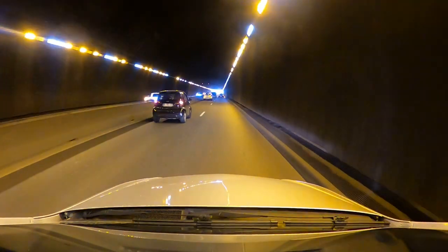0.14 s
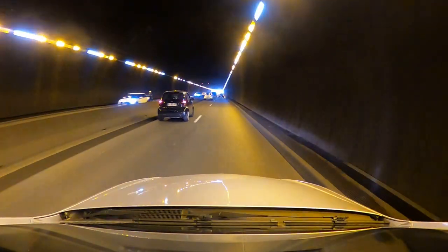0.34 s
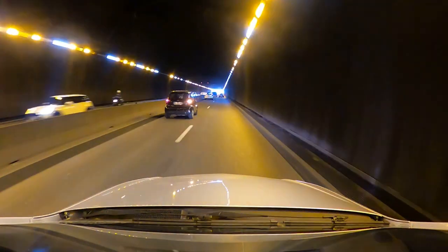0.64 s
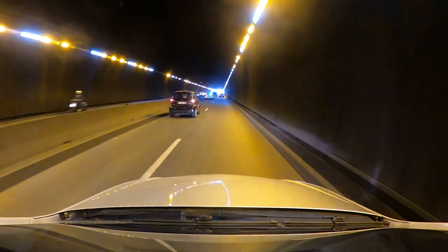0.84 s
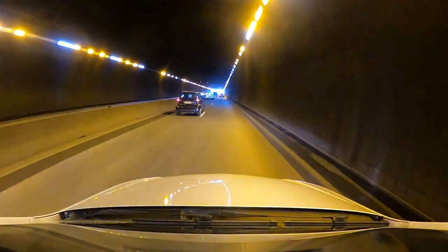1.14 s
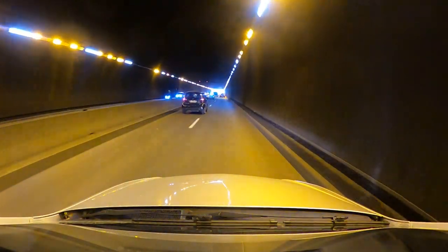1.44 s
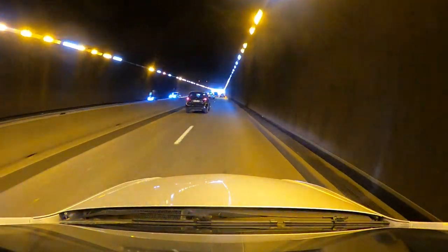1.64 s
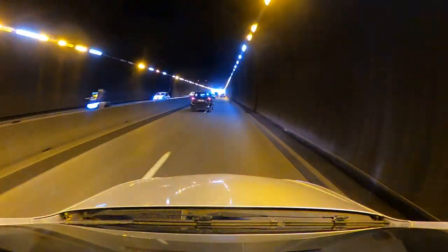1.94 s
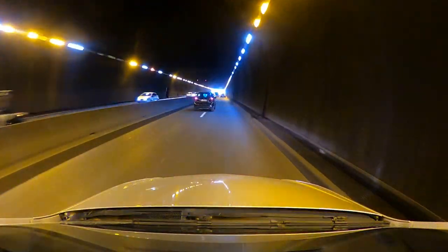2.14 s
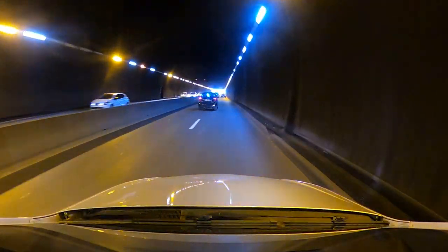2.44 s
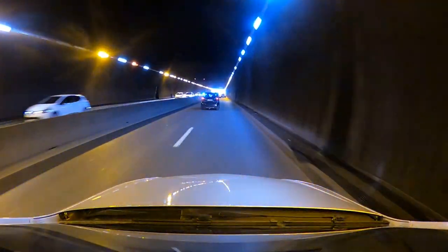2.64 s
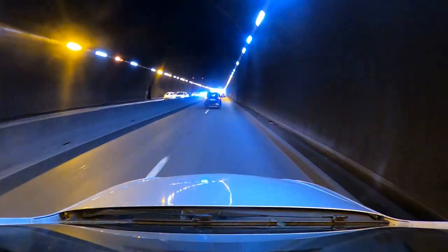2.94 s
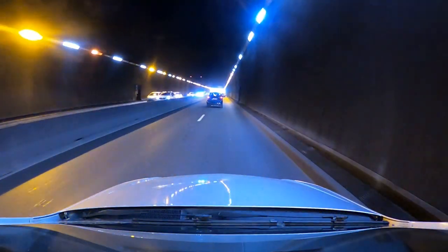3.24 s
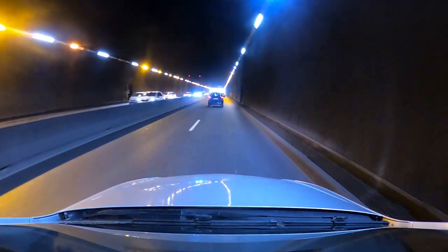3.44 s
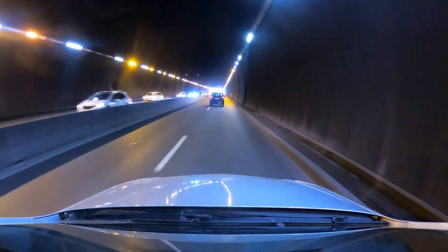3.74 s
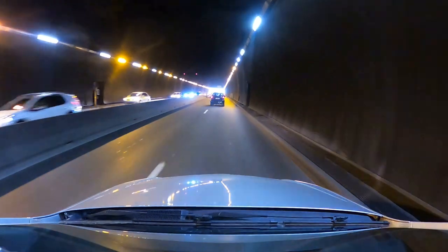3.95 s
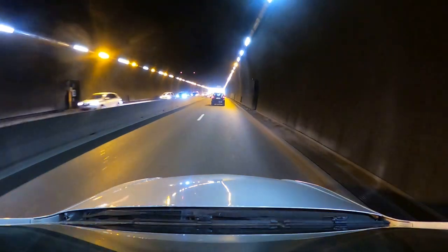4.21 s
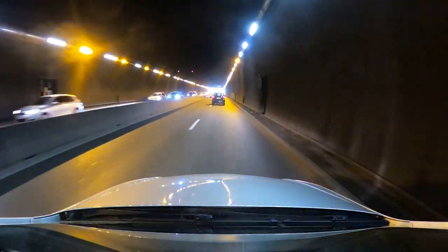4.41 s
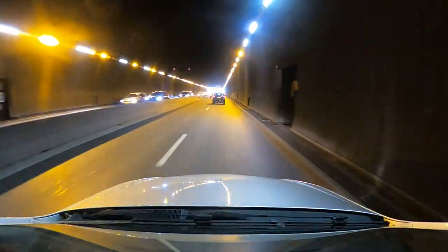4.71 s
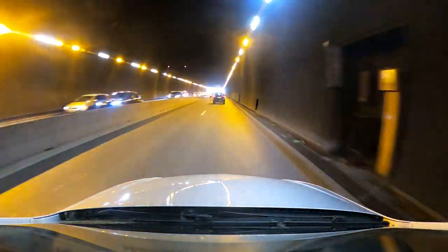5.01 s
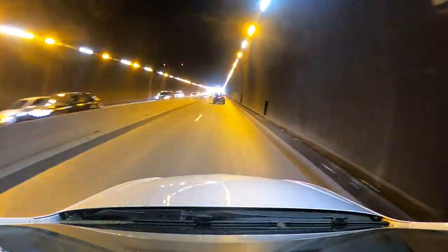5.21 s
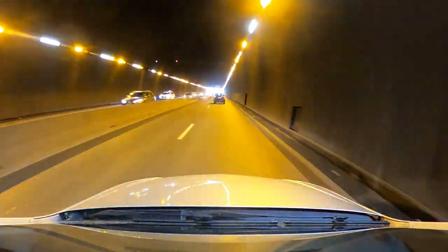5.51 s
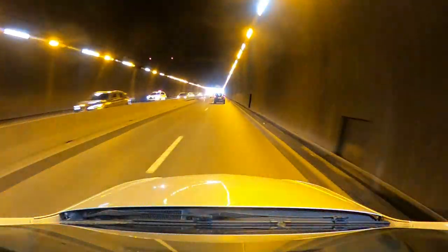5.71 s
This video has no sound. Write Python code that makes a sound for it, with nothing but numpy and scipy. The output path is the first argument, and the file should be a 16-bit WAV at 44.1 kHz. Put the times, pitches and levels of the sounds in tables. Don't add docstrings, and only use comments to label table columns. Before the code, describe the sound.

Steady boomy tunnel drive heard from a car's bonnet: shuddering low air rumble, broad tyre roar, faint hiss, soft passing swells.

```python
import sys
import numpy as np
from scipy import signal
from scipy.fft import rfft, irfft, next_fast_len
from scipy.io import wavfile
from scipy.ndimage import uniform_filter1d

SR = 44100
rng = np.random.default_rng(int(sys.argv[2]) if len(sys.argv) > 2 else 0)


def magnitude_from_level(level_db):
    exponent = np.asarray(level_db, float) / 20
    return 10 ** exponent


def output_pcm(signal):
    pcm = np.clip(np.atleast_2d(signal).T, -1, 1) * 32767
    wavfile.write(sys.argv[1], SR, np.round(pcm).astype(np.int16))


N = 258867
FRAME = 1024


def unit(x):
    return x / np.sqrt(np.mean(x ** 2) + 1e-20)


def curves(rows):
    s, *cols = np.transpose(rows)
    return [np.interp(np.arange(N) / SR, s, c) for c in cols]


def filtered(x, response):
    margin = 4096
    m = next_fast_len(len(x) + 2 * margin)
    wide = np.pad(x, (margin, m - len(x) - margin), "reflect")
    spectrum = rfft(wide) * response(np.fft.rfftfreq(m, 1 / SR))
    return irfft(spectrum, m)[margin:][:len(x)]


def coloured(x, spectrum):
    f, db = np.transpose(spectrum)

    def response(hz):
        return magnitude_from_level(np.interp(np.log(hz + 1), np.log(f + 1), db, left=-120, right=-120))

    return filtered(x, response)


def rush(spectrum, patchy_db):
    z = signal.stft(rng.standard_normal(N + 1024), nperseg=512)[2]
    field = uniform_filter1d(rng.standard_normal(z.shape), size=5, axis=0)
    field = uniform_filter1d(field, size=12, axis=1)
    noise = signal.istft(z * magnitude_from_level(patchy_db * unit(field)), nperseg=512)[1][:N]
    return unit(coloured(noise, spectrum))


def evened(x, window_s, share):
    size = max(int(window_s * SR), 1)
    power = uniform_filter1d(uniform_filter1d(x ** 2, size), size)
    return unit(x / (np.abs(power) + 1e-6) ** (np.clip(share, 0, 1) / 2))


# t/s, peak level/dB
LIMITER_TICKS = [(0.2176, -79), (0.6025, -75), (0.6319, -67), (1.0609, -75), (1.515, -78), (1.7385, -77),
                 (1.8636, -79), (2.3465, -71), (2.6988, -79), (2.7594, -80), (2.8858, -76), (2.9866, -75),
                 (3.0716, -72.5), (3.4236, -76), (3.7898, -82), (3.923, -78), (4.3679, -74), (4.384, -74),
                 (4.6424, -70), (4.678, -66), (4.694, -67.5), (4.8269, -81), (4.8925, -77.5), (5.3951, -76),
                 (5.6761, -78), (5.7223, -77)]


def ticks():
    t = np.arange(N) / SR
    gate = np.full(N, magnitude_from_level(-103))
    for s, db in LIMITER_TICKS:
        gate += magnitude_from_level(db - 7) * np.exp(-((t - s - .002) / .004) ** 2)
    return gate * rush([(9000, -7.5), (11000, -0.5), (15600, 1)], patchy_db=0)


# t abreast/s, roar level/dB, hiss level/dB
ONCOMING = [(0.0, -31, -49), (0.55, -36, -51), (0.97, -34.5, -51), (1.3, -41.5, -52.5), (1.7, -38.5, -48.5),
            (2.1, -32.5, -46.5), (2.75, -29, -44.5), (4.05, -32, -48), (4.4, -33.5, -55.5),
            (5.3, -46.5, -66), (5.6, -35, -54)]


def traffic():
    lane_m, closing_m_per_s = 8.17, 30.4
    wake = 1
    s, roar_db, hiss_db = np.transpose(ONCOMING)
    along_m = closing_m_per_s * (np.arange(N) / SR - s[:, None])
    along_m = np.where(along_m > 0, along_m / wake, along_m)
    close = 1 / (1 + (along_m / lane_m) ** 2)
    own_roar_db, own_hiss_db = -33, -50
    roar = np.sqrt(magnitude_from_level(own_roar_db) ** 2 + magnitude_from_level(roar_db) ** 2 @ close)
    hiss = np.sqrt(magnitude_from_level(own_hiss_db) ** 2 + magnitude_from_level(hiss_db) ** 2 @ close)
    return roar, hiss


# f/Hz, level/(dB per Hz)
TREAD_HISS = [(1200, -28), (2200, 0), (3000, 0), (4000, -5), (5000, -11.5), (6500, -18.5), (8000, -27),
              (9000, -34), (10000, -39.5), (11500, -47), (12300, -62), (15700, -62.5)]
# lower edge f/Hz, extra growth exponent [-]
BRIGHTENING = [
    (6000, .4),
    (11300, 3.1),
]


def tread(hiss):
    sound = rush(TREAD_HISS, patchy_db=0.03)
    knots = rng.standard_normal(N // FRAME + 2)
    flicker = np.interp(np.arange(N), np.arange(0, N + FRAME, FRAME), knots)
    for (edge_hz, extra), scatter_db in zip(BRIGHTENING, [0, 4.5]):
        top = filtered(sound, lambda hz: (hz < 12400) / (1 + (edge_hz / (hz + 1)) ** 24))
        growth = np.minimum(hiss / hiss.mean(), 1.3) ** extra
        sound = sound + top * (magnitude_from_level(scatter_db * flicker) * growth - 1)
    return hiss * sound


# f/Hz, level/(dB per Hz)
PANEL_DRONE = [(90, -31.5), (160, -0.5), (220, -1), (300, -8.5), (420, -16), (800, -50)]
# f/Hz, level/(dB per Hz)
TYRE_ROAR = [(150, -36.5), (320, -7.5), (480, -3.5), (700, -1.5), (1050, -0.5), (1400, -4.5), (2000, -10),
             (3000, -22), (5000, -46)]


def tyres():
    roar, hiss = traffic()
    drone = evened(rush(PANEL_DRONE, patchy_db=1.85), window_s=0.18, share=0.76)
    drone = magnitude_from_level(-27.5 + stirred(layer_hz=204, follows=.9)) * drone
    return drone + roar * rush(TYRE_ROAR, patchy_db=-0.08) + tread(hiss)


# t/s, level/dB
TUBE_AIRFLOW = [(0.0, -18), (0.8, -18.5), (0.98, -17.5), (1.11, -20), (1.14, -18.5), (1.91, -20),
                (2.06, -17), (2.34, -19.5), (3.38, -17), (3.94, -22), (3.99, -19), (5.4, -20),
                (5.54, -16.5), (5.87, -20)]
# t/s, swell level/dB, f/Hz
BURSTING_EDDIES = [(0.35, 4, 205), (0.49, 1, 75), (0.95, 5.5, 161), (0.97, 5.5, 58), (1.17, 3.0, 125),
                   (1.43, 1, 35), (1.49, 1.5, 75), (2.03, 5, 58), (2.22, 3, 75), (2.38, 2.5, 34),
                   (2.84, 2.5, 97), (2.88, 4.5, 34.6), (3.0, 2, 75), (3.13, 4, 156), (3.25, 5.5, 45),
                   (3.37, -0.5, 127), (3.37, 0.5, 35), (3.61, 3.5, 45), (3.84, -2, 35), (4.1, 6, 75),
                   (4.18, 4.5, 45), (4.38, 6, 75), (4.53, 5.5, 74.6), (4.66, 6, 125), (4.7, 8, 35),
                   (5.05, 5, 57.5), (5.3, 2.5, 34.6), (5.55, 4, 77), (5.61, 0.5, 35), (5.74, 4.5, 45)]
# t/s, dip level/dB, f/Hz
CLINGING_LULLS = [(0.4, 0, 35), (0.52, 2.5, 45), (0.75, -7, 57.5), (1.1, -5.3, 76), (1.16, -1, 35),
                  (1.35, -4, 96), (1.56, -4, 35), (1.68, -3.5, 124), (1.71, -3, 35), (1.86, -7.5, 96),
                  (2.03, -3, 35), (2.19, -3.5, 124), (2.29, -5.8, 58), (2.47, -3, 97), (2.6, -8, 45),
                  (2.64, -6.0, 205), (2.73, -5, 58), (3.7, -4.5, 158), (3.75, -3.5, 45), (3.97, -4.5, 125),
                  (4.15, -2.5, 57.5), (4.34, -2, 35), (4.84, -4.0, 125), (5.12, -3, 98)]


def stirred(layer_hz, follows):
    half_length_s, reach_oct, growth = 0.042, .7, 1.12
    flow_db, = curves(TUBE_AIRFLOW)
    s, db, hz = np.transpose(BURSTING_EDDIES + CLINGING_LULLS)
    near = np.exp(-(np.log2(hz / layer_hz) / reach_oct) ** 2)
    t = np.arange(0, N + 64, 64) / SR
    bursts = (growth * db * near) @ np.exp(-((t - s[:, None]) / half_length_s) ** 2)
    return follows * (flow_db - flow_db.mean()) + np.interp(np.arange(N) / SR, t, bursts)


# f/Hz, level/(dB per Hz)
HEAVE = [(1, -9), (8, 3.5), (22, 2), (30, -0.5), (42, -19.5), (80, -49)]
# f/Hz, level/(dB per Hz)
BODY_BUFFET = [(20, -22.5), (33, -4), (45, 2), (65, -1), (85, -8), (130, -20), (300, -58.5)]
# f/Hz, level/(dB per Hz)
TUBE_BOOM = [(40, -44), (65, -4), (90, 0), (125, -3.5), (160, -11.5), (220, -20), (400, -54)]


def rumble():
    buffet = evened(rush(BODY_BUFFET, patchy_db=0.0), window_s=0.26, share=.9)
    boom = evened(rush(TUBE_BOOM, patchy_db=1.6), window_s=.07, share=1.0)
    sway = evened(rush(HEAVE, patchy_db=-2.5), window_s=0.045, share=0.82)
    bass = magnitude_from_level(-24.5 + stirred(layer_hz=24, follows=.05)) * sway
    bass += magnitude_from_level(-21 + stirred(layer_hz=48, follows=.3)) * buffet
    bass += magnitude_from_level(-20.5 + stirred(layer_hz=100, follows=.9)) * boom
    ceiling = magnitude_from_level(-7)
    rounded = bass / (1 + np.abs(bass / ceiling) ** 4) ** (1 / 4)
    return filtered(rounded, lambda hz: (hz > 0) / (1 + (hz / 260) ** 6))


def scene():
    return (rumble() + tyres())[None]


# t/s, lowest lost f/Hz
TREBLE_LOSSES = [
    (.805, 6100),
    (2.013, 5300),
    (2.175, 4600),
    (2.431, 4900),
    (3.847, 4400),
    (4.219, 4900),
    (4.288, 4900),
    (5.055, 4700),
    (5.449, 3840),
]


def dropouts(x):
    out = x.copy()
    left_db = -30
    dip = 1 - np.sqrt(1 - (1 - magnitude_from_level(left_db) ** 2) * np.hanning(2 * FRAME))
    hole_maps = rng.random((len(TREBLE_LOSSES), 128)) < .45
    for (s, edge_hz), holes in zip(TREBLE_LOSSES, hole_maps):
        middle = round(s * SR)
        span = slice(middle - 2 * FRAME, middle + 2 * FRAME)

        def lost(hz):
            island_gap = holes[(hz / 180).astype(int) % 128]
            return (hz > edge_hz) | ((hz > .68 * edge_hz) & island_gap)

        out[span] -= np.pad(dip, FRAME) * filtered(x[span], lost)
    return out


def top_cut(x):
    return signal.sosfilt(signal.butter(12, 15700, fs=SR, output="sos"), x)


def record(dry):
    start = np.sin(np.pi / 2 * np.minimum(np.arange(N) / SR / .0015, 1)) ** 2
    mix = ticks() + dropouts(dry[0])
    offset = -.005
    return top_cut(start * (mix[None] + offset))


dry = scene()
out = record(dry)
output_pcm(out)
```